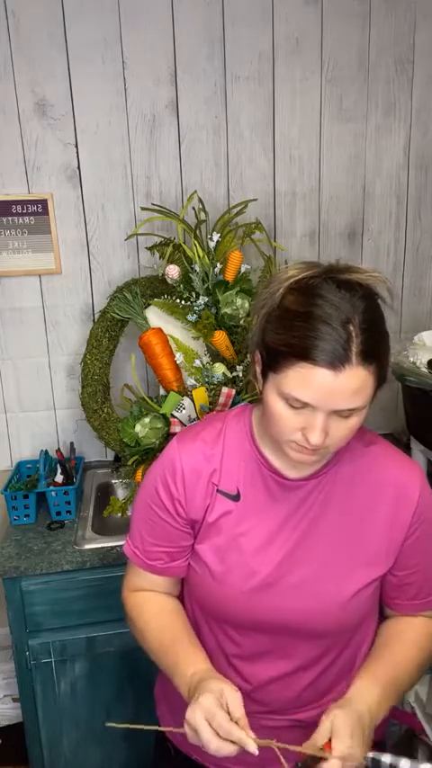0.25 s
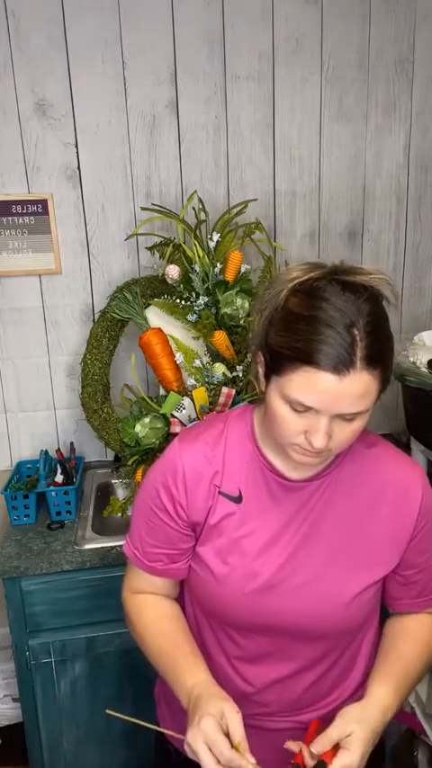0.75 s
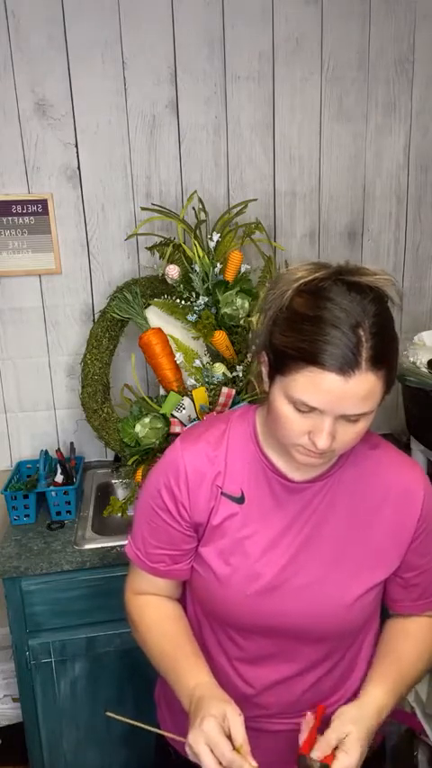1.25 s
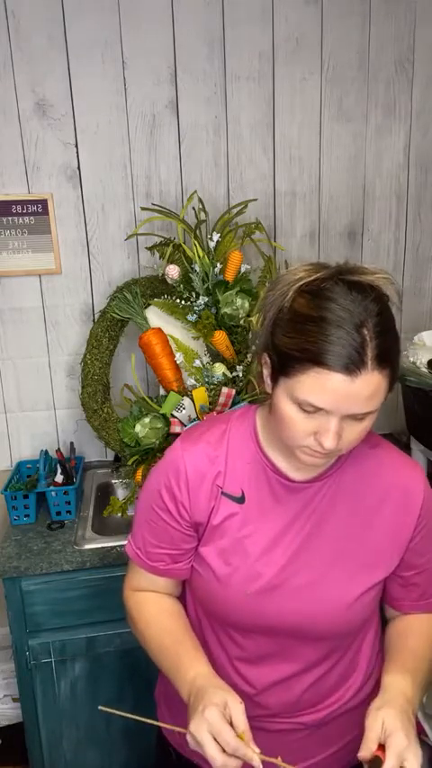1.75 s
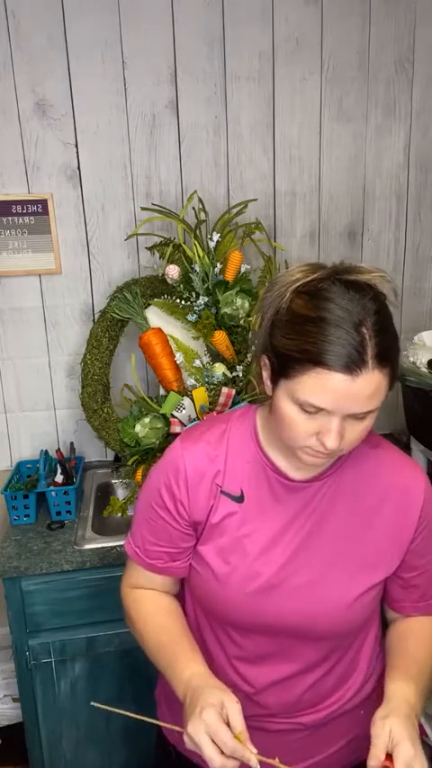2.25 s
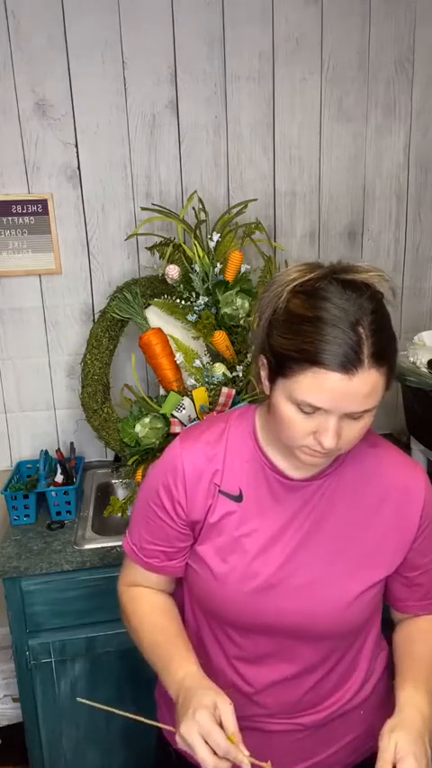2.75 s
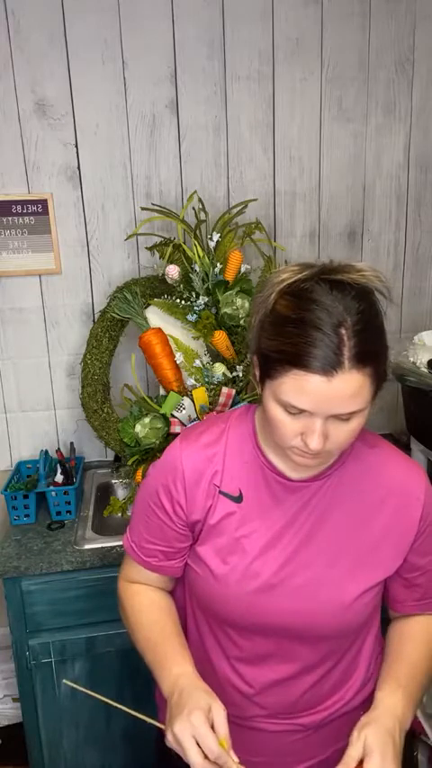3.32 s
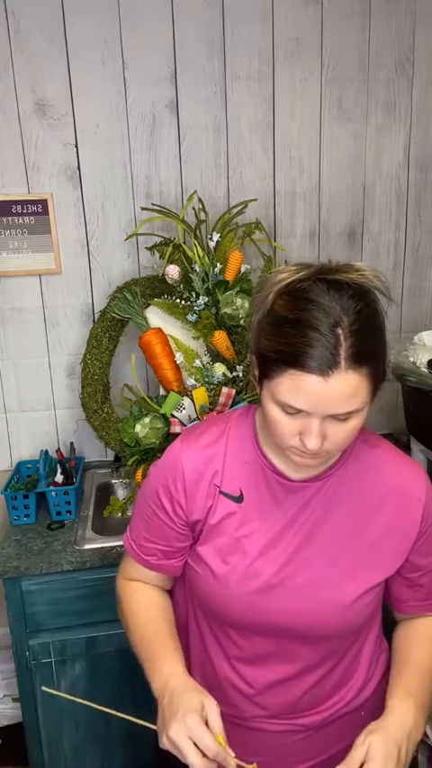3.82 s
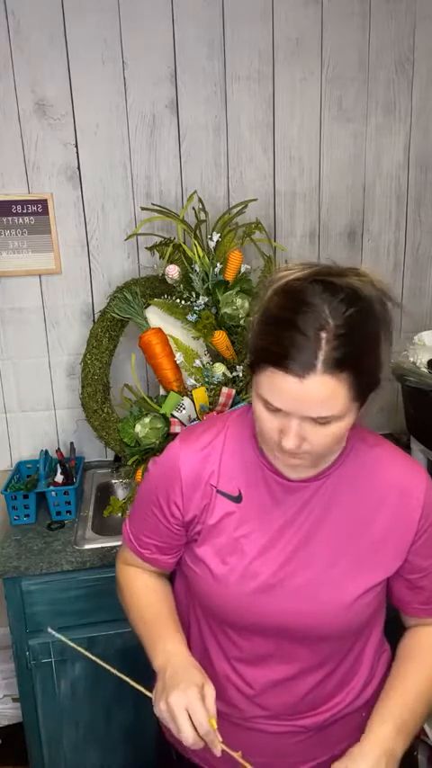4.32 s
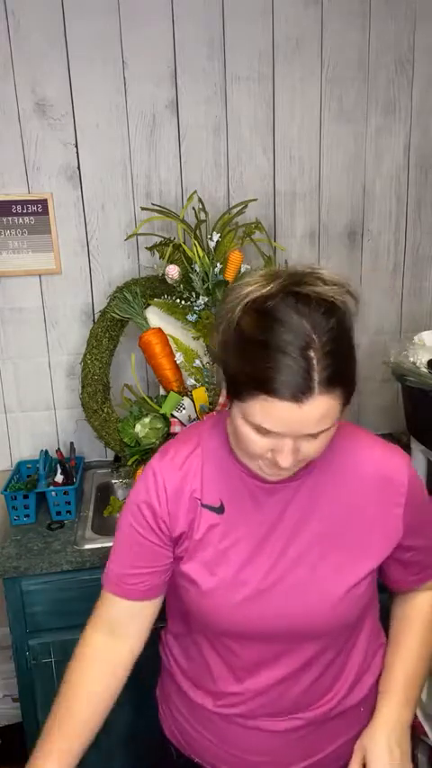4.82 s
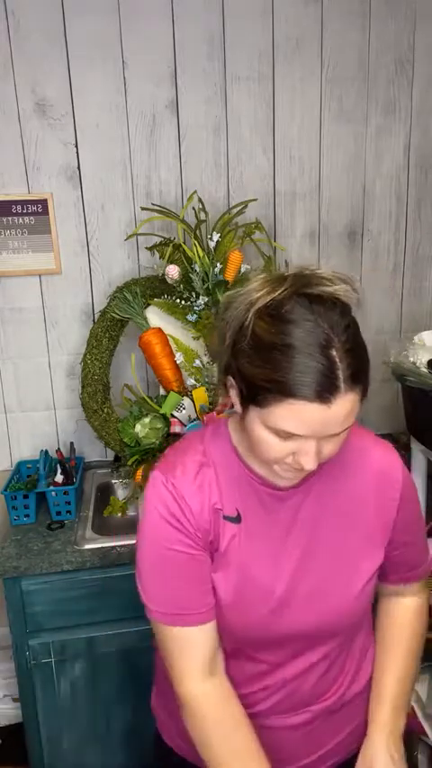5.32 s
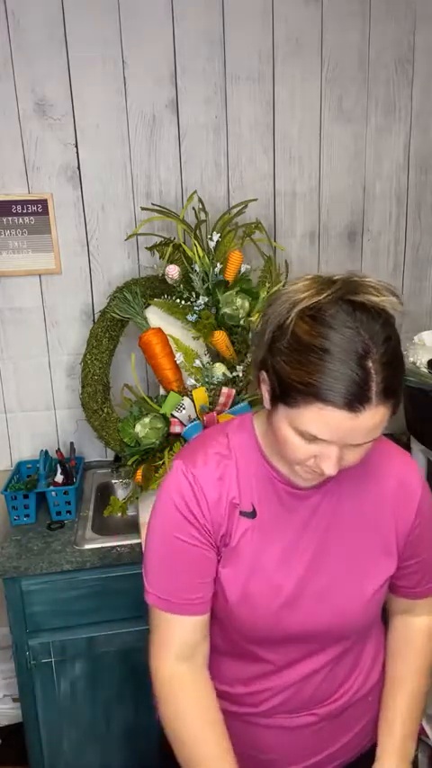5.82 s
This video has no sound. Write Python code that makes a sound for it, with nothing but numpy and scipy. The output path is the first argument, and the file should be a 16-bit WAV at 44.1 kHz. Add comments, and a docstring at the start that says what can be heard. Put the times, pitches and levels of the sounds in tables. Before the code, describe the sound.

In a small panelled room, steel hand cutters bite through a dry stem: one sharp crack early, a soft opening click and brief gritty rubs, a second snip near the middle, then a stronger, brighter third. Things are then set down and bumped on a wooden table, with double knocks and low thuds, the last by far the heaviest. A phone about a metre away hears it over faint room air.

```python
"""Hand cutters snip a dry craft stem three times in a small panelled room: fibres crack, the steel rings, the handles thump.
Between cuts the stem slides through the fingers as gritty friction and the jaws spring open with a click.
Then things are set down, bumped and shifted on a wooden work table: hard clacks, low thuds and a lingering boom.
Bursts of force drive damped resonances; a phone hears them from about a metre, over faint room air."""
import sys
import numpy as np
from scipy import signal
from scipy.fft import rfft, irfft
from scipy.io import wavfile

SR = 44100
rng = np.random.default_rng(int(sys.argv[2]) if len(sys.argv) > 2 else 0)


def dump(signal):
    """Clip the signal to [-1, 1] and save it as 16-bit WAV at the path in sys.argv[1]."""
    limited = np.clip(np.atleast_2d(signal).T, -1, 1)
    pcm = np.round(limited * 32767).astype(np.int16)
    wavfile.write(sys.argv[1], SR, pcm)


N = 267687  # length of the scene in samples
T = np.arange(int(.9 * SR)) / SR  # time axis of one short sound, s
BLOW_S = .01  # the level of a short sound is its energy spread over this time

# the three cuts: (start_s, break_length_s, steel_db, stem_db, stem_pitch_hz, thump_db, brightness_hz,
# splinter_db, first_splinter_hz, second_splinter_hz)
CUTS = [(0.2663, 0.0029, -42.5, -44.5, 1944, -52.5, 8600, -43.5, 5070, 7100),
        (2.9417, 0.0033, -44, -50, 1575, -52.5, 7160, -43, 5300, 2870),
        (4.4521, 0.00294, -39, -35.5, 1937, -49, 12600, -38, 3870, 2760)]
# resonances of the padded handles in the fist: (pitch_hz, width_hz, level_db)
HANDLE_MODES = [(202, 81, -7.5), (316, 67, -1.5), (470, 820, -7.5)]
# slides of stem, fingers and tool: (start_s, rise_s, decay_s, level_db, brightness_hz)
RUBS = [(0.488, 0.0019, 0.021, -60, 3300), (1.649, 0.0093, 0.012, -48.5, 6550),
        (1.773, 0.01, 0.0064, -61, 7200), (3.055, 0.023, 0.04, -48, 6400),
        (3.234, 0.0031, 0.028, -59, 1920), (4.611, 0.019, 0.016, -49, 6500), (4.992, 0.1, 0.021, -62, 3230),
        (5.091, 0.0079, .022, -55.5, 11700), (5.402, 0.0073, 0.1, -61.5, 3600),
        (5.600, 0.033, 0.1, -60.5, 2360), (6.023, 0.011, 0.012, -48, 2430)]
# things set down or bumped on the table touch twice: first contact, then a second
# (start_s, first_thud_db, clack_db, clack_brightness_hz, time_to_second_s, second_thud_db, boom_db)
TABLE_CONTACTS = [(4.613, -53, -54, 1470, 0.027, -46, -50.5),
                  (5.0686, -42.5, -42.5, 4400, 0.036, -50.5, -66),
                  (5.2481, -46, -50.5, 2920, .015, -59, -45), (5.4033, -46, -56, 4000, .017, -49.5, -41.5),
                  (5.5500, -53, -66, 1000, .096, -49.5, -48.5),
                  (5.7856, -42.5, -48.5, 1004, .0363, -59.5, -39.5),
                  (6.035, -22.5, -41.5, 1400, .015, -32, -37)]


def undb(db):
    """Decibels to gain."""
    return 10 ** (np.asarray(db) / 20)


def blow(x, db):
    """Scale a short sound to the energy of BLOW_S seconds at this level."""
    return x * undb(db) * np.sqrt(BLOW_S * SR / np.sum(x ** 2))


def add(track, start_s, x):
    """Mix x into the track from start_s on."""
    i = int(start_s * SR)
    track[i:i + len(x)] += x[:max(N - i, 0)]


def soften(x, hz):
    """Second-order low-pass: a softer contact."""
    sos = signal.butter(2, min(hz, .45 * SR), fs=SR, output="sos")
    return signal.sosfilt(sos, x)


def radiate(x, hz):
    """Steep high-pass: a small object cannot radiate long waves."""
    return signal.sosfilt(signal.butter(4, hz, "high", fs=SR, output="sos"), x)


def colour(x, points):
    """Shape the spectrum of x by (pitch_hz, level_db) points, joined along log frequency."""
    hz, db = np.transpose(points)
    f = np.maximum(np.fft.rfftfreq(len(x), 1 / SR), 1)
    gain = undb(np.interp(np.log(f), np.log(hz), db))
    return irfft(rfft(x) * gain, len(x))


def ring(modes):
    """Damped sines; the dB of each mode is its energy, and neighbours swing in opposite senses."""
    body = np.zeros(len(T))
    for k, (hz, width_hz, db) in enumerate(modes):
        decay = np.exp(-np.pi * width_hz * T)
        # a wide mode dies sooner, so sqrt(width) keeps its energy
        body += (-1) ** k * undb(db) * np.sqrt(width_hz) * decay * np.sin(2 * np.pi * hz * T)
    return body


def drive(force, body):
    """The response of a resonant body to a force."""
    return signal.fftconvolve(force, body)[:len(T)]


def grit(spread_db):
    """Dense tiny slips of unequal size, each size held for 8 samples; rms 1."""
    size = np.minimum(rng.exponential(size=len(T)), 5)
    x = rng.standard_normal(len(T)) * undb(spread_db * np.repeat(size, 8)[:len(T)])
    return x / np.std(x)


def fracture(length_s, fibres_db):
    """One sharp break, then the other fibres give way within a few milliseconds; all pitches are pushed alike."""
    window = np.exp(-(T / length_s) ** 4)
    force = grit(1.7) * window
    force *= undb(fibres_db) / np.sqrt(np.sum(force ** 2))
    force[0] += 1  # the first sharp break
    for _ in range(6):  # flatten the spectrum, then confine the force in time again
        spectrum = rfft(force)
        flat = irfft(spectrum / (np.abs(spectrum) + 1e-9), len(T))
        force = flat * np.sqrt(window)
    return force


def air(level_db=-69, waver_db=-0.5):
    """Faint room air: coloured noise whose level wavers a little."""
    # spectrum of the air: (pitch_hz, relative_level_per_hz_db)
    air_colour = [(15, -69), (25, -53), (58, -5), (82, -1.5), (126, -3.5), (152, -5.5), (233, -5),
                  (260, -5.5), (368, -7), (848, -11.5), (1020, -13.5), (1340, -16), (2120, -20),
                  (7700, -28), (15500, -41)]
    x = colour(rng.standard_normal(N), air_colour)
    waver = np.interp(np.arange(N), np.linspace(0, N, 30), rng.standard_normal(30))
    return x / np.std(x) * undb(level_db + waver_db * waver)


def snips(thump_lag_s=0.00243, stem_cut=0.65, jaw_cut_hz=1400):
    """The stem breaks and rings with the jaws; just after, the handles close in the fist."""
    # resonances of the steel jaws: (pitch_hz, width_hz, level_db)
    jaw_modes = [(3260, 120, -1.5), (3660, 160, -8.5), (4140, 36, -1.5), (4196, 30, -10), (4380, 150, 1),
                 (5120, 210, -1.5), (5940, 140, 1.5), (6670, 83, -9), (6850, 180, -5), (7170, 180, 1),
                 (7670, 160, -5), (8330, 200, -6), (9050, 610, -5.5), (10300, 100, -7.5),
                 (11000, 330, -5.5)]
    # resonances of the stem in the jaws: (multiple_of_stem_pitch, width_hz, level_db)
    stem_modes = [(0.70, 110, -4.5), (.82, 130, -6), (.98, 191, -1.5), (1.09, 167, -3.5), (1.219, 180, -8)]
    out = np.zeros(N)
    for start_s, length_s, steel_db, stem_db, stem_hz, thump_db, bright_hz, *_ in CUTS:
        steel = drive(fracture(length_s, fibres_db=13.5), ring(jaw_modes))
        steel = radiate(soften(steel, bright_hz), jaw_cut_hz)
        tuned_stem = ring([(k * stem_hz, width_hz, db) for k, width_hz, db in stem_modes])
        stem = drive(fracture(length_s, fibres_db=5.5), tuned_stem)
        stem = radiate(stem, stem_cut * stem_hz)
        thump = radiate(ring(HANDLE_MODES), hz=138)
        add(out, start_s, blow(steel, steel_db) + blow(stem, stem_db))
        add(out, start_s + thump_lag_s, blow(thump, thump_db))
    return out


def snaps(rows, length_s, low_hz, high_hz):
    """Small dry snaps, each with one resonance; rows of (start_s, level_db, centre_hz, width_hz)."""
    out = np.zeros(N)
    for start_s, db, hz, width_hz in rows:
        snap = drive(fracture(length_s, fibres_db=6.5), ring([(hz, width_hz, 0)]))
        add(out, start_s, blow(snap, db))
    return soften(radiate(out, low_hz), high_hz)


def splinters(first_s=.0002, second_s=.0013, second_db=-2, width_hz=400):
    """The stem sheds two splinters as it breaks, the second a little later and weaker."""
    rows = []
    for start_s, *_, db, first_hz, second_hz in CUTS:
        rows.append((start_s + first_s, db, first_hz, width_hz))
        rows.append((start_s + second_s, db + second_db, second_hz, width_hz))
    return snaps(rows, length_s=0.002, low_hz=1440, high_hz=9300)


def room(x, first_s=0.00327, early_db=3, early_s=0.05):
    """Close walls answer within milliseconds, then a diffuse tail fades in each half octave."""
    # reverberation: (pitch_hz, level_against_direct_sound_db, t60_s)
    reverberation = [(60, -4.5, 0.96), (146, 3, 0.77), (297, 4.5, 0.45), (703, 4.5, 0.42),
                     (1560, -0.5, 0.42), (3780, -7, 0.34), (7860, -2, 0.27), (15000, 6, 0.34)]
    hz, db, t60 = np.transpose(reverberation)
    spectrum, f = rfft(grit(0.61)), np.fft.rfftfreq(len(T), 1 / SR)
    early = (T > first_s) * (1 + undb(early_db) * np.exp(-T / early_s))
    response = np.zeros(len(T))
    for low in 45 * 2 ** np.arange(0, 8.5, .5):
        log_centre = np.log(low) + np.log(2) / 4
        band_db = np.interp(log_centre, np.log(hz), db)
        band_t60 = np.interp(log_centre, np.log(hz), t60)
        inside = (f >= low) & (f < low * np.sqrt(2))
        fade = np.exp(-np.log(1000) * T / band_t60)  # -60 dB after one t60
        tail = irfft(spectrum * inside, len(T)) * early * fade
        response += tail * undb(band_db) * np.sqrt(inside.mean() / np.sum(tail ** 2))
    return x + signal.fftconvolve(x, response)[:N]


def ticks():
    """Light ticks of tool and stem: brief fractures, each exciting one resonance."""
    # (start_s, level_db, centre_hz, width_hz)
    light_ticks = [(0.4880, -63, 1250, 700), (3.0620, -53, 1410, 900), (3.0655, -53, 3330, 900),
                   (3.1870, -59, 2570, 1400), (3.2360, -59, 1590, 1510), (3.540, -72, 3350, 500),
                   (3.555, -66.5, 3200, 500), (4.9947, -62.5, 2040, 1200), (5.439, -66.5, 3600, 2000),
                   (5.472, -70, 4360, 2000), (5.5420, -66, 1690, 700), (5.822, -61.5, 2000, 1500)]
    return snaps(light_ticks, length_s=0.0045, low_hz=370, high_hz=12000)


def slides(grain_db=4.0, catch_db=4.0, catch_s=.004):
    """Gritty friction that swells and dies away, catching and slipping every few milliseconds."""
    # spectrum of the friction: (pitch_hz, level_db)
    friction_colour = [(80, 0.5), (220, 1), (450, 4), (800, -1.5), (1500, 1.5), (2400, -3.5), (3600, -2.5),
                       (7000, -8.5), (10000, -15), (15500, -19)]
    out = np.zeros(N)
    for start_s, rise_s, decay_s, db, bright_hz in RUBS:
        push = np.minimum(T / rise_s, 1) * np.exp(-np.maximum(T - rise_s, 0) / decay_s)
        catches = np.interp(T / catch_s, np.arange(len(T)), rng.standard_normal(len(T)))
        friction = soften(colour(grit(grain_db), friction_colour), bright_hz)
        rub = push * undb(catch_db * catches) * friction
        # the catches leave the energy of the push unchanged
        add(out, start_s, undb(db) * rub * np.linalg.norm(push) / np.linalg.norm(rub))
    return out


def thuds(top_lag_s=0.00293, sway_lag_s=0.0062):
    """Both contacts push the table top, and the second rocks it on its legs; slides only nudge it."""
    # resonances of the table top: (pitch_hz, width_hz, level_db)
    board_modes = [(200, 75, -4), (229.5, 10.7, 1), (272.8, 13.6, -2), (317.4, 25, -3), (333.7, 18, -1.5),
                   (389, 29, -7.5), (450, 42, -13.5), (593, 106, -9.5)]
    # slow sway of the table on its legs: (pitch_hz, width_hz, level_db)
    sway_modes = [(46.3, 16, -12), (61.2, 16, -2.5), (79.5, 9.6, -0.5), (102, 22, -1)]
    sway_db, sway_per_boom = -39.5, 0.27  # level at a boom of 0 dB; slow growth, dB per dB of boom
    nudge_db = -11.5  # push at the height of a slide, against the slide's level
    top = radiate(soften(ring(board_modes), hz=873), hz=122)
    sway = soften(ring(sway_modes), hz=199)
    out = np.zeros(N)
    for start_s, first_db, _, _, gap_s, second_db, boom_db in TABLE_CONTACTS:
        add(out, start_s + top_lag_s, blow(top, first_db))
        add(out, start_s + gap_s + top_lag_s, blow(top, second_db))
        add(out, start_s + gap_s + sway_lag_s, blow(sway, sway_db + sway_per_boom * boom_db))
    for start_s, rise_s, _, db, _ in RUBS:
        add(out, start_s + rise_s + top_lag_s, blow(top, db + nudge_db))
    return out


def opening(thump_lag_s=.046, thump_db=-7):
    """The jaws spring open and click on their stop; then the handles meet the palm."""
    # the one opening: (start_s, level_db)
    start_s, db = (1.348, -57)
    # resonances of pivot and stop: (pitch_hz, width_hz, level_db)
    stop_modes = [(1020, 200, -1), (2430, 150, -0.5), (2910, 68, -1), (5490, 320, -2.5)]
    click = radiate(drive(fracture(.005, fibres_db=12), ring(stop_modes)), hz=600)
    thump = soften(radiate(ring(HANDLE_MODES), hz=140), hz=260)
    out = np.zeros(N)
    add(out, start_s, blow(click, db))
    add(out, start_s + thump_lag_s, blow(thump, db + thump_db))
    return out


def clacks(second_db=-11, second_bright_hz=1520):
    """Hard contacts with the table: a first one, then a weaker second one of one fixed brightness."""
    # resonances of hard contact with the table: (pitch_hz, width_hz, level_db)
    contact_modes = [(533, 136, -1.5), (920, 160, -3), (1260, 250, -1), (1596, 140, 3), (1970, 330, -1.5),
                     (2370, 170, -0.5), (2810, 340, -2), (3320, 410, 0)]
    out, contact = np.zeros(N), ring(contact_modes)
    for start_s, _, clack_db, bright_hz, gap_s, *_ in TABLE_CONTACTS:
        first = (start_s, clack_db, bright_hz)
        second = (start_s + gap_s, clack_db + second_db, second_bright_hz)
        for at_s, db, hz in (first, second):
            clack = soften(drive(fracture(0.0045, fibres_db=2.0), contact), hz)
            add(out, at_s, blow(clack, db))
    return out


def standing_waves(lag_s=0.0073):
    """The second contact wakes a low boom that lingers between the walls."""
    # standing waves of the room: (pitch_hz, width_hz, level_db)
    wall_modes = [(117, 20, -20), (129.2, 2.45, 1.5), (156, 3.7, -5)]
    out, boom = np.zeros(N), soften(ring(wall_modes), hz=300)
    for start_s, *_, gap_s, _, boom_db in TABLE_CONTACTS:
        add(out, start_s + gap_s + lag_s, blow(boom, boom_db))
    return out


def scene(thud_send=0.66, snip_top_hz=11800):
    """All handling sounds share the room; the low thuds reach the phone more directly."""
    cutters = snips() + splinters()
    # the snips fall away in the highest treble
    cutters = signal.sosfilt(signal.butter(5, snip_top_hz, fs=SR, output="sos"), cutters)
    handling = ticks() + opening() + clacks() + slides()
    low = thuds()
    in_room = room(cutters + handling + thud_send * low)
    return (in_room + (1 - thud_send) * low + standing_waves() + air())[None]


def record(dry, bass_hz=42, top_hz=15750, stop_s=.002):
    """The phone drops the deepest bass and cuts the top; the scene ends with a brief fade."""
    thin = signal.sosfilt(signal.butter(2, bass_hz, "high", fs=SR, output="sos"), dry)
    stop = np.minimum(np.arange(N)[::-1] / (stop_s * SR), 1)
    return signal.sosfilt(signal.ellip(8, .2, 70, top_hz, fs=SR, output="sos"), thin * stop)


dry = scene()
out = record(dry)
dump(out)
```